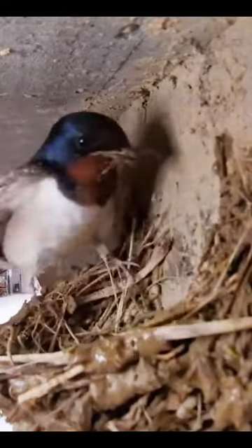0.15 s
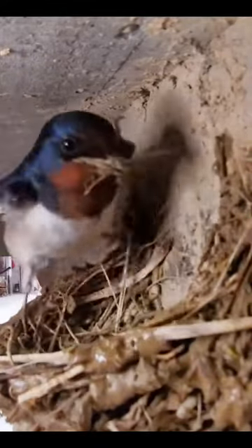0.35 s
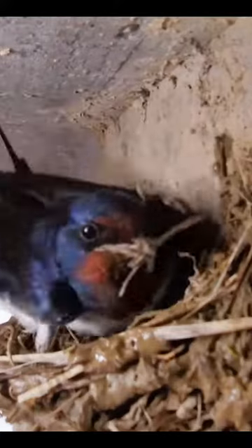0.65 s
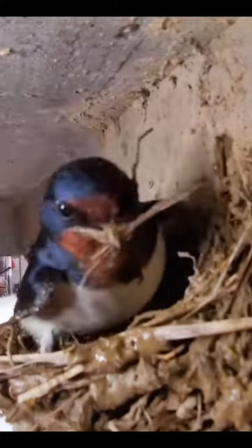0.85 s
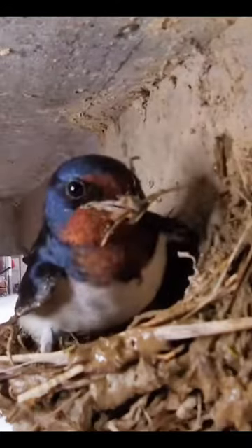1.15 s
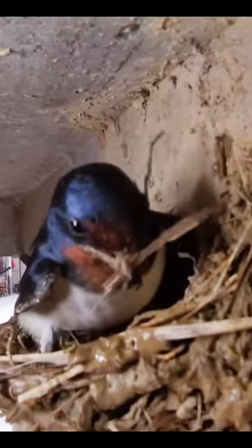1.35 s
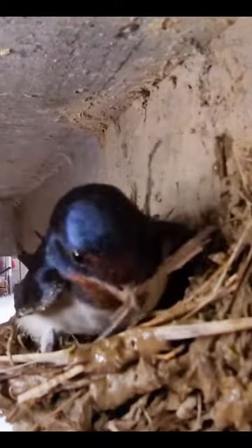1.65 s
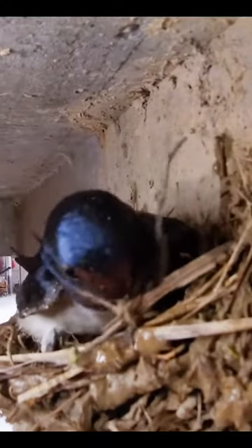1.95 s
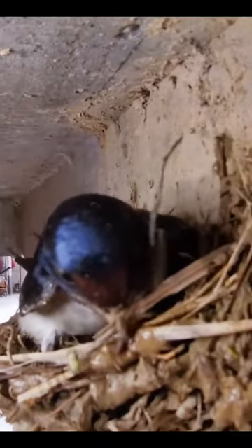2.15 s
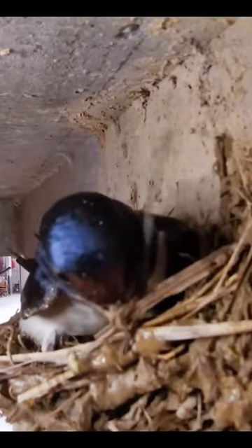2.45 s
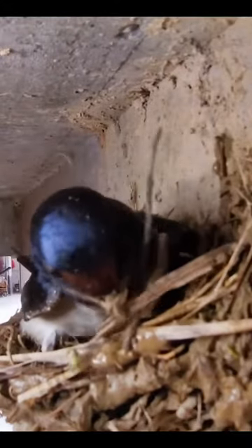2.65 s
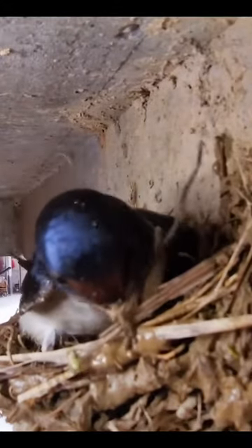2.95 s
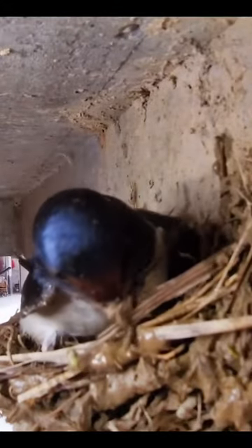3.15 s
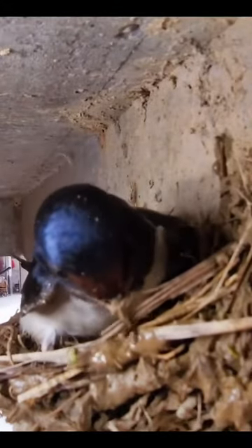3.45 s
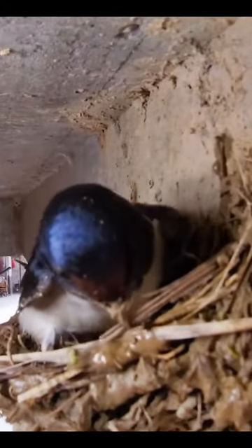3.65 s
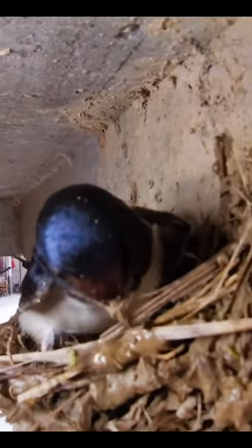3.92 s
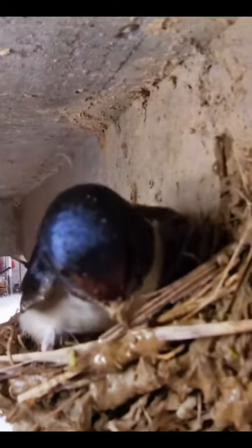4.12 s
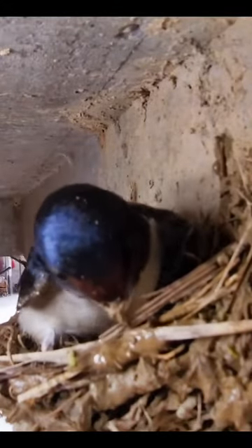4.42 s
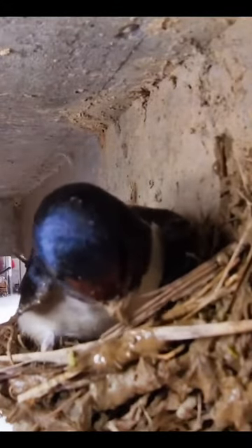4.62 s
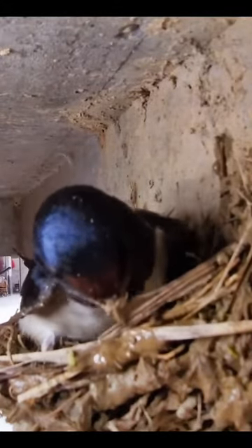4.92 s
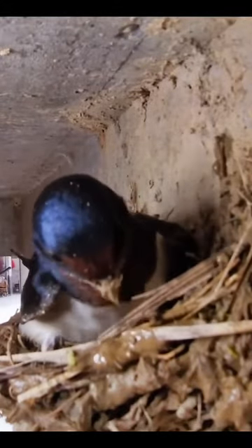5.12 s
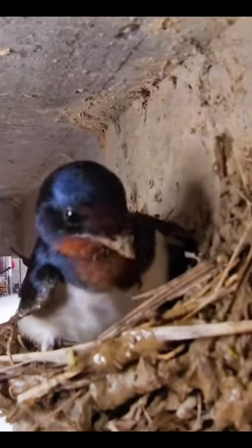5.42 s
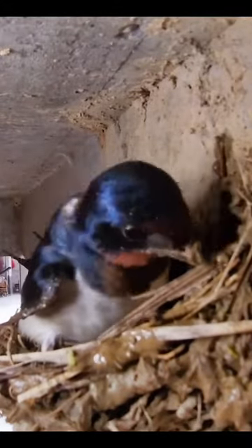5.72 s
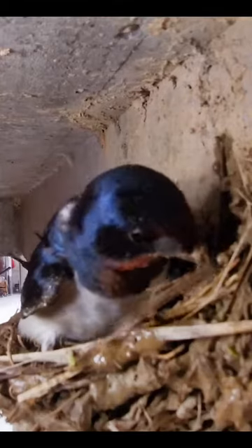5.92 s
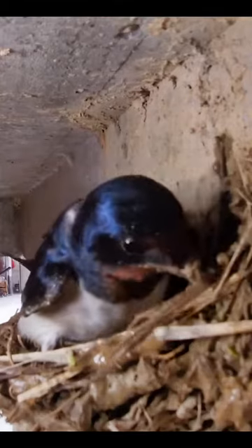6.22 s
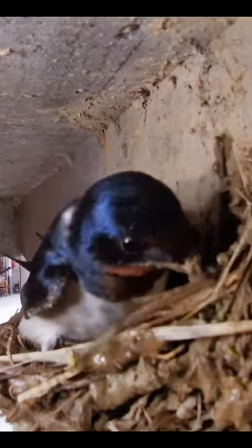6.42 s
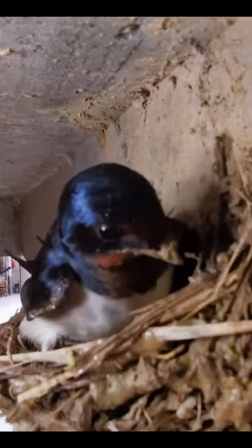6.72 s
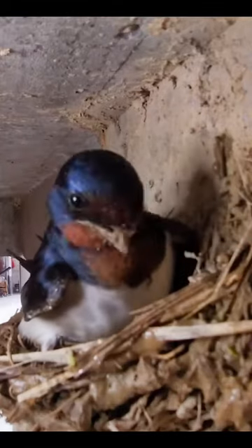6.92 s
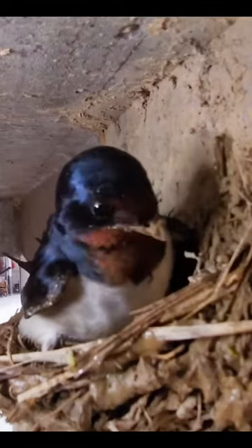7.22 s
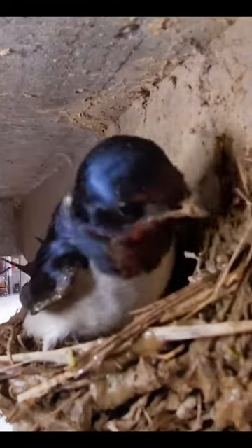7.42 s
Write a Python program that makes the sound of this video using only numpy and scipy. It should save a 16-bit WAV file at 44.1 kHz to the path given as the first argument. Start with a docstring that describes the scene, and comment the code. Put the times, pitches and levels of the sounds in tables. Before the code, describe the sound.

A barn swallow twitters on its nest, very close to the microphone, in a concrete corner that adds quick slaps and a short ring. A buzz and sharp chirps open the first 0.2 seconds, then soft rasps, a faint low whine and weak buzzes follow. From 0.7 to 1.1 a dry rattle of fast tiny clicks runs with harsh rasps. After a short pause, loud rising chirps and chips tumble out from 1.4 to 1.9, then from 2.0 to 4.0 dense chatter turns buzzier, its pitch mostly 3 to 6 kHz. A gap follows until 4.5. Brisk chirping resumes to about 6.0, with a brief straw scratch at 5.1. Shorter clusters come at 6.3 to 6.7 and 6.85 to 7.55. Soft low rubbing surfaces near 2.6 to 3.0 and 4.7 to 5.3, above a faint steady outdoor hush.

```python
"""In a corner under a concrete ceiling, a barn swallow twitters on its nest, close to the microphone.
Gliding tones with partials and air make its chirps, chips, buzzes and rasps; noise bursts and
pulse trains make a dry rattle. Echoes and decaying noise tails throw the song back off the walls.
Soft low rubbing, two bands of noise shaped by strokes, comes and goes over a faint outdoor hush of noise."""
import sys
import numpy as np
from scipy import signal
from scipy.fft import rfft, irfft
from scipy.io import wavfile
from scipy.ndimage import map_coordinates

SR = 44100
rng = np.random.default_rng(int(sys.argv[2]) if len(sys.argv) > 2 else 0)


def dump_mix(stems):
    """Bounce the given channels to the path in sys.argv[1] as a 16-bit WAV at rate SR."""
    frames = np.atleast_2d(stems).T  # one column per channel
    limited = np.clip(frames, -1, 1)  # hard clip at full scale
    pcm = np.round(limited * 32767).astype(np.int16)
    wavfile.write(sys.argv[1], SR, pcm)


N = 333837
HZ = np.fft.rfftfreq(N, 1 / SR)
CUTOFF_HZ = 15400
# time left on both sides of a note for it to swell and fade
MARGIN_S = .015
# the syrinx repeats near this rate in chirps and chips; roughness 1 lifts their side partials by this much
SYRINX_HZ, ROUGH_SIDE_DB = 1344, 12.5


def song():
    """All the notes the syrinx sings, each laid in at its moment."""
    margin = int(MARGIN_S * SR)
    out = np.zeros(N + SR)
    for start_s, sound in (*chirps(), *chips(), *buzzes(), *rasps(), *whine()):
        at = max(0, int(start_s * SR))
        out[at:at + len(sound)] += sound
    return out[margin:margin + N]


# upward sweeps: start_s, length_s, start_pitch_hz, top_pitch_hz, level_db (before the song gain),
# swell_db, beak_resonance_hz, roughness (0-1)
CHIRP_NOTES = [(.163, 0.023, 3750, 6950, -22.5, 0, 5460, 0.45),
               (1.441, 0.032, 3800, 5440, -43, 11, 3800, 0.14),
               (1.53, 0.029, 3495, 6000, -35, 7, 3850, 0.3),
               (1.704, 0.017, 3190, 4120, -20, 10, 4500, 0.79),
               (1.734, .026, 2900, 4210, -25, -2, 3920, 0.43),
               (2.081, 0.053, 2400, 3210, -42.5, 9, 2760, 0.39),
               (2.146, .029, 2450, 3630, -31, 4, 3630, 0.75),
               (2.248, .027, 2570, 5990, -27, 5.5, 4300, 0.79),
               (2.392, 0.029, 3905, 5160, -22, 2, 4900, 0.56),
               (2.554, 0.019, 2943, 4460, -22.5, 9.5, 4320, 0.43),
               (3.049, 0.032, 2600, 2657, -34.5, 13, 3200, .4),
               (3.071, .027, 3234, 4470, -20.5, -3, 4330, 0.86),
               (3.291, 0.044, 3850, 5530, -30.5, 10, 3540, 0.74),
               (4.519, 0.052, 4490, 5080, -43, 4, 3600, 0.54), (4.653, 0.024, 3037, 4450, -29, 1, 5400, .2),
               (4.733, 0.028, 3003, 4545, -27.5, 11, 5540, 0.46),
               (5.034, 0.035, 3700, 4600, -37, 0, 3170, 1),
               (5.058, 0.014, 2760, 3290, -30.5, 13, 4220, 0.26),
               (5.118, 0.023, 2890, 4060, -34.5, 1, 3800, 0.25),
               (5.213, 0.038, 2796, 3195, -35, 7.5, 3520, 0.67),
               (5.247, .028, 3600, 4610, -27.5, 1, 4200, 0.8),
               (5.617, 0.034, 3600, 4980, -29, 8.5, 3230, 1),
               (5.687, 0.021, 2900, 4230, -29, -14, 4300, .9),
               (5.741, 0.042, 2993, 4220, -29, 8, 4340, 0.77),
               (5.774, .023, 4020, 5650, -24, 1.5, 4260, .6), (5.84, .026, 3413, 5800, -24, 1, 5000, .45),
               (5.911, 0.029, 3200, 5950, -25.5, 7, 4800, 0.67),
               (5.994, 0.027, 2880, 5770, -26.5, 7.5, 4600, 0.51),
               (6.442, 0.032, 3000, 4490, -29.5, 7.5, 5400, .2),
               (6.525, 0.015, 3040, 3270, -28.5, -1, 4280, .12),
               (6.54, 0.025, 3593, 4270, -24, 7, 5550, 0.44),
               (6.936, 0.02, 2950, 3490, -29.5, 9.5, 4540, 0.82),
               (7.014, 0.042, 2700, 3340, -35, 5, 3440, 0.55),
               (7.042, 0.033, 2970, 4404, -27.5, 8.5, 3800, 0.65),
               (7.131, .023, 2750, 3470, -32, 4.5, 4250, 0.49),
               (7.414, 0.052, 2200, 4396, -40, 15, 2860, 0.76),
               (7.553, .02, 2700, 3530, -45, 16, 3200, 0.42)]


def chirps(halfway=.25, octave_db=-25.5, smooth_side_db=-11):
    """Upward sweeps that steepen, a quarter of the rise done at half time; most grow louder."""
    for start_s, length_s, first_hz, top_hz, level_db, swell_db, beak_hz, rough in CHIRP_NOTES:
        middle_hz = first_hz + halfway * (top_hz - first_hz)
        multiple = period((first_hz + top_hz) / 2, rough)
        side_db = smooth_side_db + ROUGH_SIDE_DB * rough
        yield start_s, note(length_s, [first_hz, middle_hz, top_hz], multiple,
                            level_db - swell_db / 2, level_db + swell_db / 2, side_db, beak_hz,
                            np.clip(rough, 0, 1), octave_db=octave_db)


# short held notes: start_s, length_s, start_pitch_hz, held_pitch_hz, level_db (before the song gain),
# roughness (0-1)
CHIP_NOTES = [(.126, 0.036, 3910, 3500, -35, 0.43), (0.18, 0.026, 4600, 4500, -29, 0.52),
              (0.178, 0.017, 6800, 7100, -29, 0.46), (1.473, 0.0078, 4450, 3900, -29.5, 0.13),
              (1.558, .019, 3670, 4870, -25, 0.23), (1.562, 0.016, 5880, 6290, -28.5, 0.061),
              (1.673, 0.026, 4490, 3000, -31.5, 0.63), (1.758, 0.032, 3800, 3950, -20.5, .28),
              (1.834, 0.025, 4200, 4600, -20, 0.86), (1.853, 0.028, 2880, 3100, -26, 0.28),
              (2.175, 0.026, 3670, 3850, -20.5, 0.11), (2.267, 0.014, 6420, 6500, -26, 0.059),
              (2.271, 0.021, 4870, 5030, -21.5, .16), (2.288, 0.024, 3505, 4100, -19.5, 0.48),
              (2.415, 0.035, 4640, 4850, -21.5, 0.44), (2.415, 0.021, 7160, 6500, -30, 0.083),
              (2.579, 0.024, 4030, 3900, -23, 0.12), (2.607, 0.031, 4070, 3950, -29, 0.15),
              (3.335, .038, 4680, 4750, -23, 0.84), (3.602, 0.031, 3003, 3130, -31, 0.19),
              (3.961, .021, 4250, 4400, -25.5, 0.34), (4.577, 0.013, 5070, 5330, -21, 0.028),
              (4.659, 0.018, 4820, 5150, -27, 0.63), (4.755, 0.03, 5230, 5840, -28, 0.32),
              (4.766, 0.027, 4160, 4050, -30, 0.68), (4.83, 0.049, 4380, 3600, -36, 0.65),
              (4.867, 0.02, 5290, 5200, -33, 0.77), (4.892, .03, 4126, 4700, -26.5, 0.61),
              (5.136, 0.02, 4530, 5000, -26, 0.86), (5.33, 0.027, 3617, 4100, -25.5, 0.11),
              (5.351, 0.03, 4185, 3900, -28, 0.18), (5.414, 0.044, 3940, 4100, -35, 0.091),
              (6.301, 0.016, 4020, 4200, -44, .05), (6.334, 0.023, 4610, 5100, -40, 0.6),
              (6.363, 0.024, 5170, 5300, -26, 0.16), (6.458, 0.01, 4890, 5150, -20, 0.06),
              (6.554, .033, 5180, 5940, -28, 0.51), (6.573, 0.032, 4110, 4270, -29.5, 0.19),
              (6.629, 0.066, 3540, 3300, -34.5, 0.65), (6.649, 0.05, 2500, 2720, -44, 0.46),
              (6.691, 0.024, 4320, 4700, -23, 0.34), (6.87, 0.025, 2800, 3030, -29.5, 0.54),
              (6.945, 0.021, 4834, 4900, -25, 0.12), (7.153, 0.024, 3760, 4050, -22.5, 0.15),
              (7.176, .018, 4450, 4240, -25.5, 0.23), (7.242, .022, 4170, 4050, -35, 0.059),
              (7.505, 0.022, 2740, 2950, -32, 0.19)]


def chips(fade_db=2.0, centre_hz=4070, smooth_side_db=-16, beak_follows=0.24):
    """Tones that slide to a pitch, hold it and fade; the beak resonance partly follows the pitch."""
    for start_s, length_s, first_hz, held_hz, level_db, rough in CHIP_NOTES:
        beak_hz = centre_hz * (held_hz / centre_hz) ** beak_follows
        side_db = smooth_side_db + ROUGH_SIDE_DB * rough
        yield start_s, note(length_s, [first_hz, held_hz, held_hz], period(held_hz, rough),
                            level_db + fade_db / 2, level_db - fade_db / 2, side_db, beak_hz,
                            np.clip(rough, 0, 1))


# gliding stacks of partials: start_s, length_s, start_pitch_hz, end_pitch_hz,
# period_multiple (cycles per syrinx repeat), level_db (before the song gain), beak_resonance_hz,
# roughness (0-1), undertone_db (relative to level_db, before the second voice's trim)
BUZZ_NOTES = [(0, 0.095, 3083, 3430, 3, -31.5, 3300, 0.79, -19.5),
              (.49, 0.088, 2617, 3010, 6, -47, 2960, 0.31, -13.5),
              (0.563, 0.16, 2950, 3340, 6, -42, 4480, 0.2, -22),
              (1.617, 0.027, 5020, 5010, 2, -27.5, 4070, 0.6, -6),
              (2.022, 0.04, 4040, 4573, 3, -28, 3860, 0.67, -8.5),
              (2.332, 0.061, 3322, 3830, 3, -29.5, 3800, 1, -41),
              (2.508, .049, 4176, 5160, 4, -27, 3150, 0.87, -36),
              (2.69, 0.028, 3440, 4096, 4, -21, 4430, 0.78, -31),
              (2.72, 0.052, 2837, 2574, 2, -33.5, 3870, .55, -8.5),
              (2.771, 0.078, 3600, 4105, 4, -31, 3460, 0.71, -20),
              (2.85, 0.077, 2870, 3814, 4, -37, 3400, 0.67, -10),
              (2.91, 0.045, 4390, 5140, 4, -26.5, 3650, 0.81, -28),
              (2.951, 0.043, 4690, 4516, 3, -23.5, 4630, 0.68, -28),
              (2.991, 0.061, 4527, 4035, 3, -26.5, 3170, 0.61, -7.5),
              (3.171, 0.047, 3665, 4157, 4, -31.5, 3460, 0.2, -10.5),
              (3.211, .043, 3320, 4540, 5, -32, 3630, 0.57, -27),
              (3.428, 0.059, 3100, 3790, 7, -28, 3260, 0.49, -12.5),
              (3.479, .043, 4270, 5340, 8, -24, 3970, 0.71, -26.5),
              (3.623, 0.05, 5540, 4364, 3, -26, 3650, 0.71, -13),
              (3.726, 0.055, 3160, 4410, 8, -25.5, 3220, 0.33, -18),
              (3.774, 0.045, 4890, 5280, 8, -25, 3980, 0.46, -31),
              (3.875, .06, 2985, 4310, 4, -30.5, 3320, 0.39, -10.5),
              (3.936, 0.025, 4547, 5408, 5, -23.5, 3980, 0.58, -9),
              (5.492, .028, 5124, 5580, 5, -28.5, 3730, 0.81, -27),
              (7.308, 0.026, 2900, 3380, 4, -29, 4550, 0.57, -27),
              (7.453, .039, 4000, 4575, 4, -28.5, 3000, 0.71, -43)]


def buzzes(open_beak_db=7.0, smooth_side_db=0.5, rough_side_db=1.5, fade_db=0.8, undertone_hz=1496):
    """Straight glides rich in partials; a second voice doubles a low one, near undertone_hz."""
    for start_s, length_s, first_hz, last_hz, multiple, level_db, beak_hz, rough, under_db in BUZZ_NOTES:
        pitches = np.linspace(first_hz, last_hz, 3)
        multiple, rough = max(2, round(multiple)), np.clip(rough, 0, 1)
        # a resonance above the pitch strengthens the partials
        open_db = open_beak_db * np.log2(beak_hz / pitches[1])
        side_db = smooth_side_db + rough_side_db * rough + open_db
        yield start_s, note(length_s, pitches, multiple, level_db + fade_db / 2, level_db - fade_db / 2,
                            side_db, beak_hz, rough)
        ratio = max(1, round(undertone_hz * multiple / pitches.mean())) / multiple
        yield start_s, second_voice(length_s, ratio * first_hz, ratio * last_hz, level_db + under_db, rough)


# harsh notes whose rough partials and air outweigh the leading tone: start_s, length_s,
# beak_resonance_hz, level_db (before the song gain), roughness (held to at most 1)
RASP_NOTES = [(0.3, 0.061, 3650, -45.5, 0.67), (0.357, 0.1, 4210, -41.5, 0.82),
              (0.709, 0.061, 4860, -35, 0.77), (0.77, 0.026, 5240, -46, 0.4),
              (0.857, 0.11, 4840, -42.5, 1.05), (1.019, 0.055, 4860, -39.5, .95),
              (1.073, 0.036, 4560, -37, 0.9), (1.581, 0.042, 3204, -37, 0.7),
              (1.984, .042, 3092, -35, 0.62), (2.658, 0.033, 4450, -27, 1.17),
              (3.554, 0.0445, 2756, -31.5, 1.04), (5.468, 0.038, 3690, -31.5, 0.67),
              (5.652, 0.047, 3400, -33.5, 1.08), (6.849, 0.053, 3276, -35.5, 0.9),
              (7.28, 0.044, 3500, -33, 0.8)]


def rasps(pulse_hz=629, rise=.1, side_db=8):
    """Slow rough pulses, near pulse_hz, that rise a little and ring in the beak."""
    for start_s, length_s, beak_hz, level_db, rough in RASP_NOTES:
        pitches = beak_hz * (1 + rise * np.linspace(-1, 0, 3))
        yield start_s, note(length_s, pitches, round(beak_hz / pulse_hz), level_db, level_db,
                            side_db, beak_hz, np.clip(rough, 0, 1))


# low end of a soft whine: start_s, length_s, start_pitch_hz, end_pitch_hz
WHINE_GLIDE = (.54, .18, 487, 572)
# its harmonics from the fundamental up: level_db (before the second voice's trim and the song gain)
WHINE_HARMONICS = [-66.5, -58.5]


def whine(rough=0.091):
    """The lowest harmonics of a soft rising whine, each a wavering glide."""
    start_s, length_s, first_hz, last_hz = WHINE_GLIDE
    for k, level_db in enumerate(WHINE_HARMONICS, 1):
        yield start_s, second_voice(length_s, k * first_hz, k * last_hz, level_db, rough)


def period(pitch_hz, rough, whistle_roughness_max=.215):
    """Cycles of the tone after which the syrinx repeats; smoother notes are plain whistles."""
    return 1 if rough < whistle_roughness_max else max(2, round(pitch_hz / SYRINX_HZ))


def note(length_s, pitches_hz, multiple, early_db, late_db, side_db, beak_hz, rough,
         jitter=0.028, jitter_hz=520, shimmer=0.26, release_s=0.011, attack_s=0.015, swell_s=0.048,
         octave_db=-34.5, trill_hz=170, trill_spread_db=2.04, trill_depth=0.056, throb=0.17):
    """A gliding tone; when the syrinx repeats only every few cycles, partials appear between its harmonics."""
    size = int((length_s + 2 * MARGIN_S) * SR)
    t = np.arange(size) / SR - MARGIN_S
    along = np.clip(t / length_s, 0, 1)
    # a buzz on a long period holds its pitch more steadily than a short chirp
    unsteady = (rough + .25) * min(1, 4.5 / multiple)
    wobble = jitter * unsteady * flutter(size, jitter_hz) * min(1, rough * 6)
    pitch = np.interp(along, [0, .5, 1], pitches_hz) * (1 + wobble)
    # a very fast trill, its rate scattered from note to note, breaks the glide into strokes
    trill_rate = trill_hz * from_db(rng.normal(0, trill_spread_db))
    trill = np.sin(2 * np.pi * (trill_rate * t + rng.random()))
    base = pitch * (1 + trill_depth * rough * unsteady * trill) / multiple
    phase = 2 * np.pi * np.cumsum(base) / SR

    octave = from_db(octave_db) * np.sin(2 * multiple * phase)
    lead = np.sqrt(2) * (np.sin(multiple * phase) + octave)

    # side partials: harmonics of the repeat rate except the leading tone
    k = np.arange(1, 29)[:, None]
    weights = beak(k * base, beak_hz) * (k != multiple) * (k * base < CUTOFF_HZ)
    partials = rms_one(np.sum(weights * np.sin(k * phase + rng.uniform(0, np.pi, k.shape)), axis=0))

    # turbulent air is let through once a period; a plain whistle has almost only air beside it
    air = rng.standard_normal(2 ** 14)[:size] * (1 + 0.3 * np.cos(phase))
    air = rms_one(irfft(rfft(air) * beak(np.fft.rfftfreq(size, 1 / SR), beak_hz), size))
    noisy = .8 * rough ** 1.7 if multiple > 1 else .99
    sides = np.sqrt(1 - noisy) * partials + np.sqrt(noisy) * air

    unevenness = np.exp(rough * (shimmer * flutter(size, 327) + throb * trill))
    voice = (lead + from_db(side_db) * sides) * unevenness
    # rough notes swell in more slowly than whistles
    edges = gate(t, length_s, min(attack_s + swell_s * rough, .7 * length_s), release_s)
    level = from_db(np.interp(along, [.2, .75], [early_db, late_db]))
    return rms_one(voice) * edges * level


def second_voice(length_s, first_hz, last_hz, db, rough, jitter=0.067, shimmer=1.0, trim_db=-2.0):
    """The other side of the syrinx adds a low wavering glide."""
    size = int((length_s + 2 * MARGIN_S) * SR)
    t = np.arange(size) / SR - MARGIN_S
    wobble = jitter * rough * flutter(size, 408.4)
    pitch = np.interp(t, [0, length_s], [first_hz, last_hz]) * (1 + wobble)
    tone = np.sin(2 * np.pi * np.cumsum(pitch) / SR) * np.exp(shimmer * rough * flutter(size, 241))
    return from_db(db + trim_db) * rms_one(tone) * gate(t, length_s, 0.024, 0.014)


# throat colour of partials and air: frequency_hz, gain_db
THROAT_COLOUR = [(400, -44.5), (900, -9.5), (1400, -3), (2000, -1), (3000, -0.5), (4500, -0.5),
                 (6300, -3.5), (6800, -17), (8500, -6.5), (9200, -13), (11500, -9), (12500, -20),
                 (15000, -23)]


def beak(hz, centre_hz, octaves=0.57, skirt_db=-20.5):
    """The throat's colour, with a broad resonance that follows the gape."""
    bump = np.exp(-.5 * (np.log2((hz + 1) / centre_hz) / octaves) ** 2)
    return gain_at(THROAT_COLOUR, hz) * (bump + from_db(skirt_db))


# dry clicks of the rattle: start_s, peak_db (before the rattle gain)
RATTLE_CLICKS = [(0.845, -20), (0.8768, -20.5), (0.9359, -18), (0.973, -24.5), (1.0037, -19), (1.042, -18),
                 (1.071, -16.5), (1.1133, -19.5), (2.6666, -23)]
# colour shared by clicks and crackle: frequency_hz, relative_gain_db
CLICK_COLOUR = [(150, -56), (500, -62), (1400, -11), (3000, -6.5), (5500, 1), (8400, -8.5), (9300, -38),
                (13000, -22), (15000, -36)]


def rattle(decay_s=.0016, gain_db=3.0):
    """Each click is a sharp broad noise burst, gone in a few milliseconds."""
    t = np.arange(2 ** 10) / SR
    colour = gain_at(CLICK_COLOUR, np.fft.rfftfreq(len(t), 1 / SR))
    out = np.zeros(N)
    for start_s, peak_db in RATTLE_CLICKS:
        burst = rng.standard_normal(len(t)) * np.exp(-t / decay_s)
        # a short lead-in leaves room for the filter to ring before the onset
        burst = irfft(rfft(np.roll(burst, 2 ** 5)) * colour)
        at = int(start_s * SR)
        out[at:at + len(t)] += burst / np.abs(burst).max() * from_db(peak_db + gain_db)
    return out


def crackle(start_s=.725, length_s=0.303, per_s=260, level_db=-43.0, spread_db=5.5):
    """Between its loud clicks the rattle runs on as a quick train of small uneven pulses."""
    times_s = start_s + np.cumsum(rng.uniform(.5, 1.5, 256)) / per_s
    sizes = from_db(spread_db * rng.standard_normal(len(times_s)))
    pulses = np.zeros(N)
    pulses[(times_s * SR).astype(int)] = sizes * rng.choice([-1, 1], len(times_s))
    pulses *= gate(np.arange(N) / SR - start_s, length_s, 0.033, 0.014)
    train = irfft(rfft(pulses) * gain_at(CLICK_COLOUR, HZ), N)
    # the level holds over the train, not over the whole scene
    return from_db(level_db) * rms_one(train) * np.sqrt(length_s * SR / N)


def straw(start_s=5.1, length_s=0.038, level_db=-41):
    """A dry stalk scratches briefly as the bird turns: a short gated noise."""
    # frequency_hz, relative_gain_db
    colour = [(200, -53), (800, -11), (1500, -5.0), (2500, -5), (4000, -4.0), (5700, -7),
              (7500, -5), (11000, -30)]
    scratch = stereo_noise(colour, 0.4)[0]
    return from_db(level_db) * scratch * gate(np.arange(N) / SR - start_s, length_s, 0.0036, 0.012)


# first echoes off the walls: delay_s, level_db (relative to the direct sound)
WALL_ECHOES = [(.0032, -35), (.0112, -36.5), (.0178, -22.5), (.0315, -40.5), (.0410, -10)]


def walls(x, near_db=0.0, near_t60_s=0.15, far_db=-12.0, far_t60_s=0.32, alike=0.64, channel_lag_s=.00005):
    """Direct sound, a few distinct echoes, quick scatter in the corner and a longer, duller ring."""
    t = np.arange(SR // 2) / SR
    response = np.zeros((2, len(t)))
    response[:, 0] = 1
    for k, (delay_s, db) in enumerate(WALL_ECHOES):
        # echoes reach one channel slightly earlier, by turns left and right
        for channel, sign in enumerate((1, -1)):
            arrival_s = delay_s + sign * (-1) ** k * channel_lag_s
            response[channel, int(arrival_s * SR)] += from_db(db)
    # frequency_hz, relative_gain_db
    near_colour = [(100, -2.5), (5000, -4), (15000, -2.5)]
    far_colour = [(100, 6.5), (3500, 5.0), (5500, -3), (7000, -10.0), (15000, 0.5)]
    for db, t60_s, colour in ((near_db, near_t60_s, near_colour), (far_db, far_t60_s, far_colour)):
        decay = from_db(-60 * t / t60_s) * (1 - np.exp(-t / 0.005))
        tail = stereo_noise(colour, alike)[:, :len(t)] * decay
        response += from_db(db) * rms_one(tail) / np.sqrt(len(t))
    return signal.fftconvolve(x[None], response, axes=1)[:, :N]


# strokes of rubbing: start_s, length_s, thud_db, scrape_db (both before the gains in rubbing)
RUB_STROKES = [(0, 0.045, -62.5, -61), (0.186, 1.7, -75.5, -67.5), (2.573, 0.11, -65, -61.5),
               (2.7, 0.091, -61.5, -61), (2.899, .23, -61.5, -60), (2.98, .03, -56, -50),
               (4.7, 0.61, -76, -60.5)]
# colours of the two bands: frequency_hz, relative_gain_db
THUD_COLOUR = [(15, -15), (50, -2), (80, -1), (125, 2.5), (190, -5), (400, -34)]
SCRAPE_COLOUR = [(30, -14.5), (110, -6.5), (220, -2.5), (400, -2), (700, -1.5), (1200, -5.5), (3000, -24.5)]


def rubbing(thud_gain_db=1.5, scrape_gain_db=3.5, rest_thud_db=-78.5, rest_scrape_db=-68.5,
            waver_db=2.0, edge_s=0.034):
    """Soft uneven friction: a dull thudding and a low scrape, swelling with each stroke, faint between."""
    t = np.arange(N) / SR
    thud, scrape = from_db(rest_thud_db), from_db(rest_scrape_db)
    for start_s, length_s, thud_db, scrape_db in RUB_STROKES:
        stroke = gate(t - start_s, length_s, edge_s, edge_s)
        thud = np.maximum(thud, from_db(thud_db) * stroke)
        scrape = np.maximum(scrape, from_db(scrape_db) * stroke)
    low = from_db(thud_gain_db) * thud * stereo_noise(THUD_COLOUR, 0.11)
    mid = from_db(scrape_gain_db) * scrape * stereo_noise(SCRAPE_COLOUR, .35)
    return (low + mid) * from_db(waver_db * flutter(N, 18))


# colour of the outdoor hush: frequency_hz, relative_gain_db
HUSH_COLOUR = [(350, -77.5), (600, -12), (855, -8.5), (1380, -7), (2100, -7.5), (2400, -7), (8990, -19),
               (11000, -22), (12100, -33), (15500, -30)]


def hush(level_db=-61):
    """The faint outdoor hush: steady coloured noise, partly shared by the two channels."""
    return from_db(level_db) * stereo_noise(HUSH_COLOUR, .5)


def from_db(db):
    """Decibels to amplitude."""
    return 10 ** (np.asarray(db) / 20)


def rms_one(x):
    """Scales a sound to an rms of 1."""
    return x / np.sqrt(np.mean(x ** 2) + 1e-20)


def gain_at(spectrum, hz):
    """Gain of a (frequency_hz, gain_db) spectrum, joined on a log axis."""
    points_hz, db = np.transpose(spectrum)
    return from_db(np.interp(np.log(hz + 1), np.log(points_hz), db))


def flutter(size, rate_hz):
    """Smooth chance that changes rate_hz times a second; spread about 1."""
    points = rng.standard_normal(1024)
    return map_coordinates(points, [np.arange(size) * rate_hz / SR], order=2, mode="wrap")


def stereo_noise(spectrum, alike):
    """Coloured noise, partly shared by the two channels; its common part has rms 1."""
    mid, side = irfft(rfft(rng.standard_normal((2, N))) * gain_at(spectrum, HZ), N)
    alike = np.clip(alike, 0, 1)
    width = np.sqrt((1 - alike) / (1 + alike))
    return rms_one(mid) + width * rms_one(side) * np.array([[1], [-1]])


def gate(t, length_s, attack_s, release_s):
    """Smooth opening around time 0 and closing around the length."""
    ramp = np.minimum(t / attack_s, (length_s - t) / release_s) + .5
    return np.sin(np.pi / 2 * np.clip(ramp, 0, 1)) ** 2


def scene(song_gain_db=1.0):
    """The bird in its corner, the rubbing and the hush."""
    bird = walls(from_db(song_gain_db) * song() + rattle() + crackle() + straw())
    return bird + rubbing() + hush()


def record(dry):
    """A steep elliptic low-pass cuts the top."""
    return signal.sosfilt(signal.ellip(10, .2, 80, CUTOFF_HZ, fs=SR, output="sos"), dry)


dry = scene()
out = record(dry)
dump_mix(out)
```